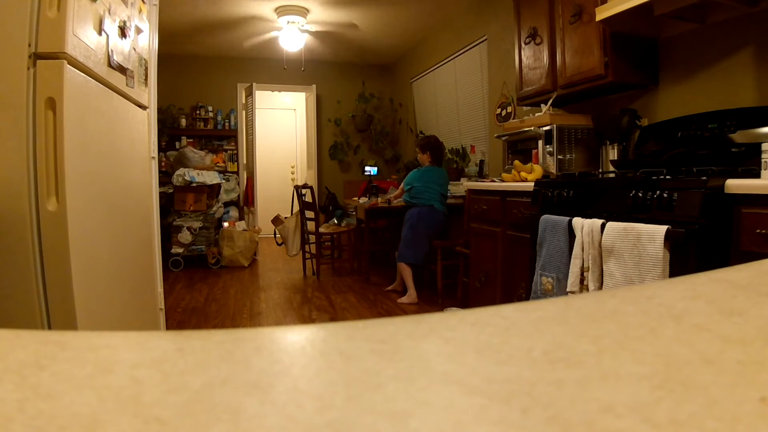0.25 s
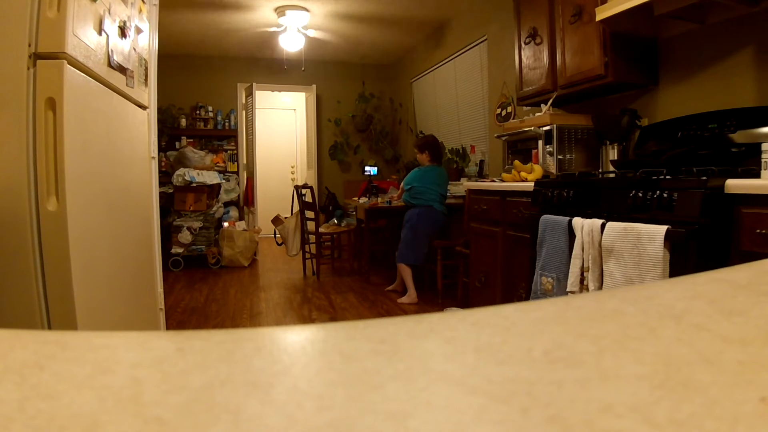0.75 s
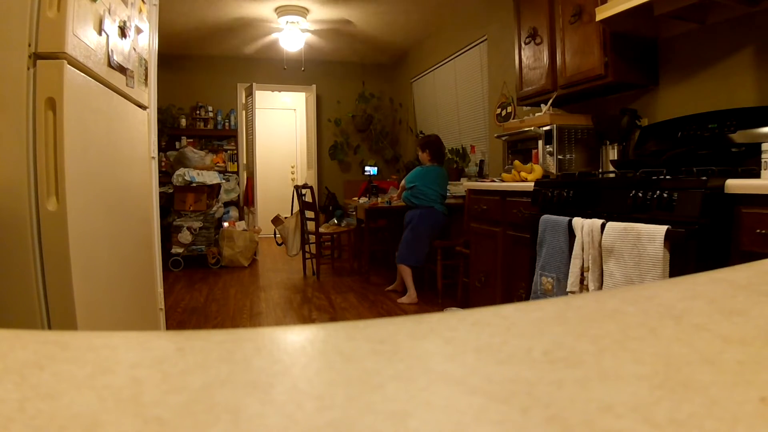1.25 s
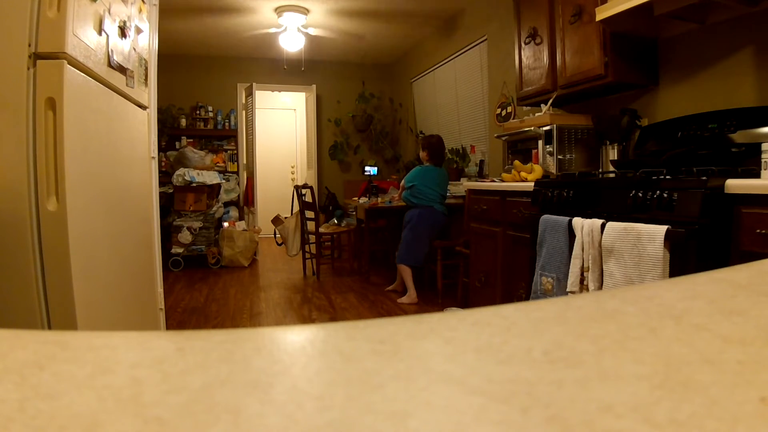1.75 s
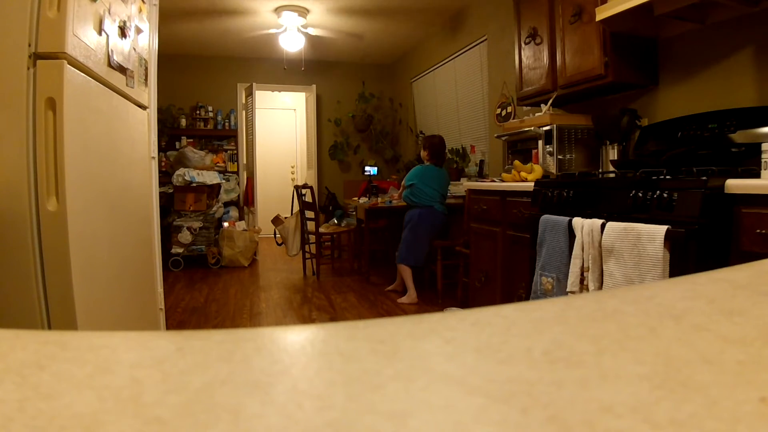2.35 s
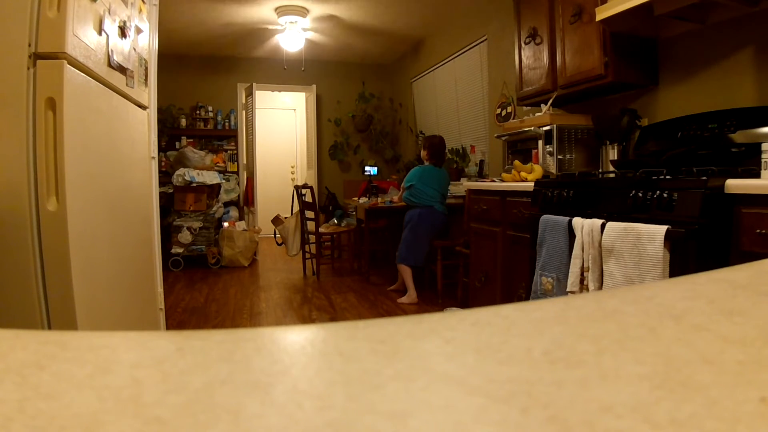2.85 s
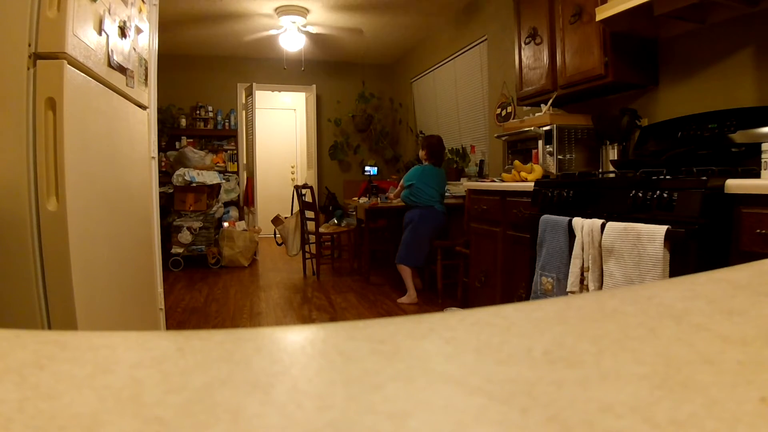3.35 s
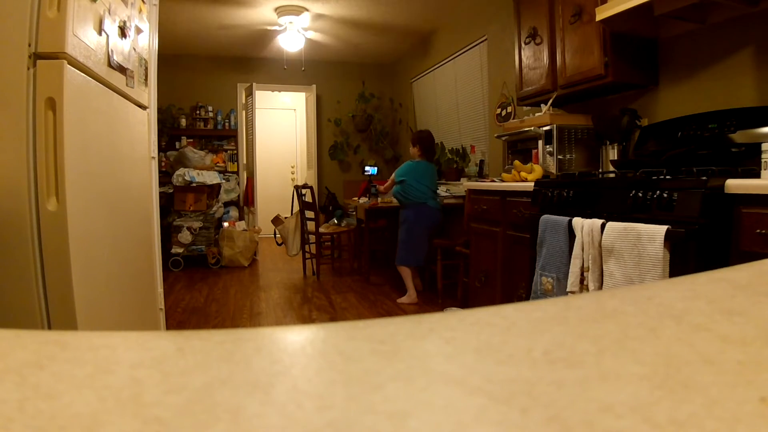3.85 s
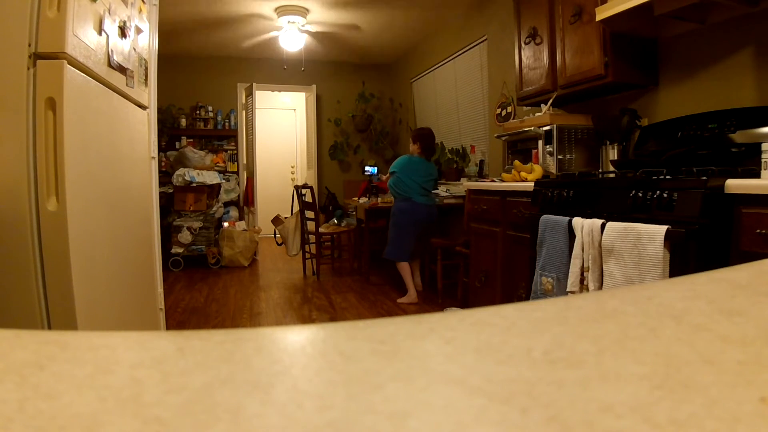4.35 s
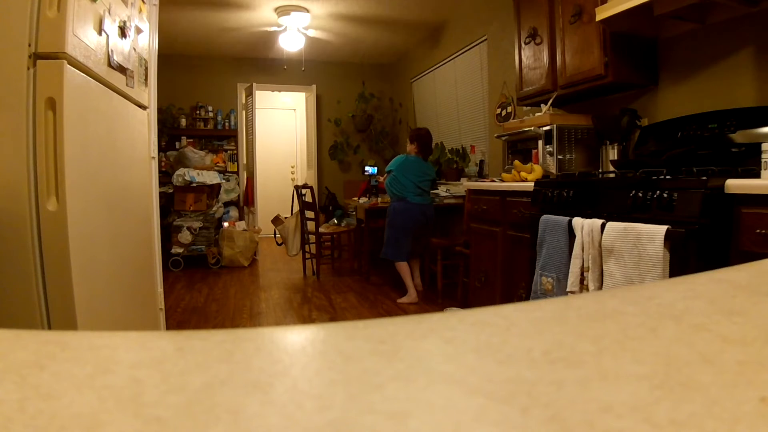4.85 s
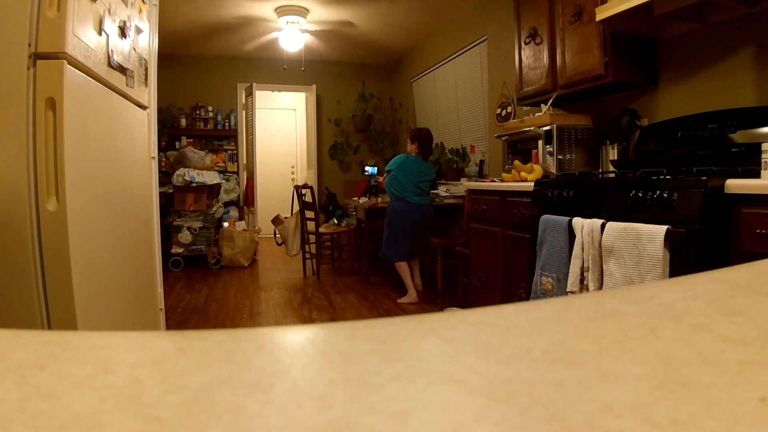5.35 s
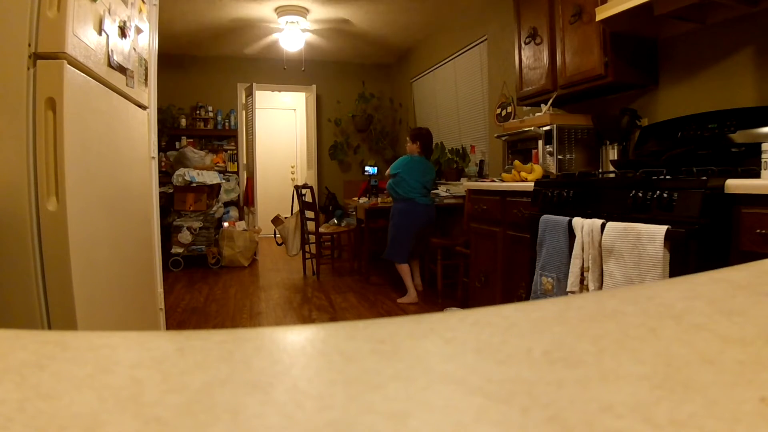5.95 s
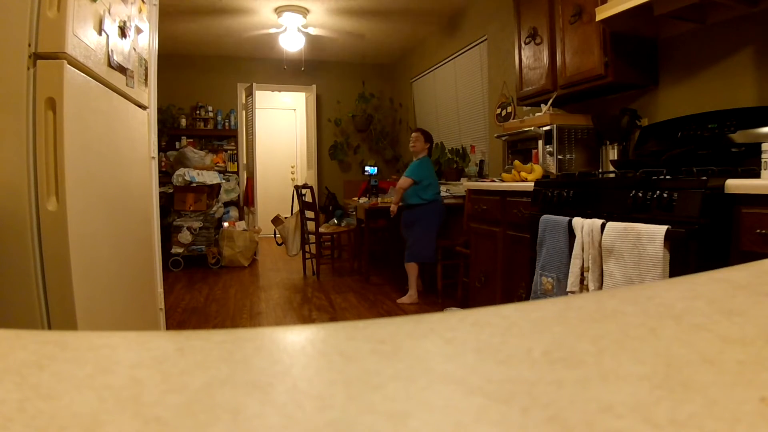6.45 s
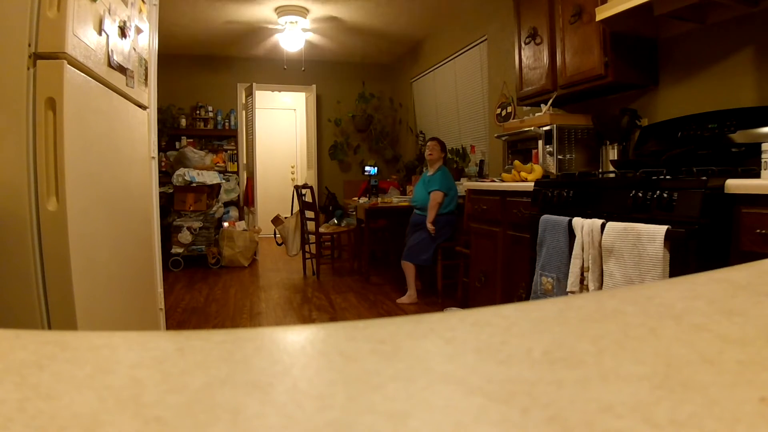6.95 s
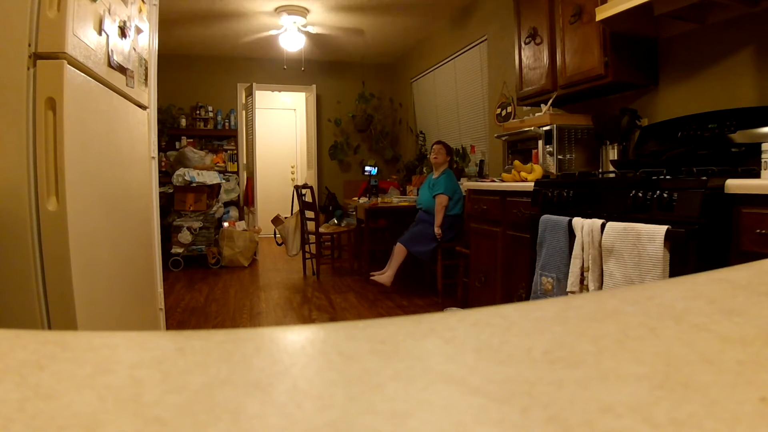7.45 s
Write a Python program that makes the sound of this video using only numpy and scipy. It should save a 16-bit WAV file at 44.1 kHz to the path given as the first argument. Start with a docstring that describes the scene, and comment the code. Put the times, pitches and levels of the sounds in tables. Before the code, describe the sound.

In a small kitchen a microwave oven runs throughout, a low mains hum with a gently throbbing fan and muffled rushing air. Over it come faint counter ticks, soft cloth brushes and a short foot scuff, then a dull floor thud and more light taps. Near the end a wooden chair knocks as someone sits. The microphone is stationary, with the person across the room and slight room echo.

```python
"""In a small kitchen a microwave oven runs: its transformer hums at harmonics of the mains.
Its cooling fan, turning just below mains speed, beats against the hum and blows noisy air through the vents.
Someone shifts about at the counter with faint taps, rustles and a scuff, then sits down on a wooden chair.
Periodic sources are sums of sines; air and contacts are shaped noise, with a short echo on the contacts."""
import sys
import numpy as np
from scipy import signal
from scipy.fft import rfft, irfft, next_fast_len
from scipy.io import wavfile
from scipy.ndimage import map_coordinates

SR = 44100
rng = np.random.default_rng(int(sys.argv[2]) if len(sys.argv) > 2 else 0)


def wav_out(sig):
    """Save sig, one row per channel (or a flat mono array), as 16-bit PCM at SR to the path in sys.argv[1]."""
    wavfile.write(sys.argv[1], SR, np.round(np.clip(np.atleast_2d(sig).T, -1, 1) * 32767).astype(np.int16))


N = 340452

MAINS_HZ, FAN_HZ, WHINE_HZ, DRONE_HZ = 59.975, 58.25, 100.8, 226.6
SWELL_PERIOD_S, SWELL_CREST_S = 5.3, 1.45  # slow cycle of the hum, and a time at its top
SQUEAK_HZ = 5300  # mean pitch
TOP_HZ = 15720  # band limit of the microphone

# In every colour table density_db is relative, in dB per Hz: the noise is then scaled to rms 1.
# Transformer harmonics: order (multiple of the mains), mean_rms_db
HUM_HARMONICS = [(1, -42.5), (2, -34), (3, -68), (4, -47), (5, -67.5), (7, -65.5), (9, -63), (12, -69),
                 (13, -70), (14, -66), (15, -65), (16, -76), (17, -66), (18, -65.5), (19, -78), (20, -76.5),
                 (21, -71.5), (22, -66), (24, -77), (25, -76), (26, -76.5), (27, -82), (28, -81), (30, -83)]
# Harmonics on the slow cycle: order, mean_rms_db, swing_db (negative sinks as the others rise)
SWELLING_HARMONICS = [(6, -45, 1.26), (8, -52, -.5), (10, -59, -2)]
# Fan tones, blade rate on top: order (multiple of the shaft rate), mean_rms_db
FAN_HARMONICS = [(1, -61.5), (2, -67), (7, -67), (8, -47.5)]
# A second, fainter motor: order (multiple of its speed), mean_rms_db
WHINE_HARMONICS = [(1, -64), (2, -59), (6, -69)]
# An unsteady drone: order, mean_rms_db
DRONE_HARMONICS = [(1, -58), (2, -67.5)]
# Spectrum of rushing air: frequency_hz, density_db
AIR_COLOUR = [(10, -11), (22, 1), (130, -1.5), (250, 4), (500, -2.5), (750, -3), (1080, -5), (1200, -12.5),
              (1700, -14.5), (1920, -22.5), (2600, -26.5), (3100, -40), (4300, -44.5), (6500, -59)]
# Resonances of the case and vents: centre_hz, width_hz, lift_db
VENT_RESONANCES = [(176, 21, 7.5), (199.3, 28, 10), (299, 26, 6.5), (356, 50, 8), (456, 33, 10.5),
                   (597, 69, 8), (910, 83, 1.5), (1366, 240, 3.5), (2095, 60, 3.5), (2630, 30, 5),
                   (2790, 62, 6.5), (2935, 45, 2.5), (3080, 70, 5), (3540, 140, 2), (4020, 350, 3)]
# Light taps and ticks at the counter: start_s, level_db, ring_db, ring_hz, t60_s, rise_s
COUNTER_TAPS = [(.247, -67, -75, 3250, .17, .005), (.664, -74, -76, 3150, .24, .01),
                (.666, -76, -82, 5500, .14, .005), (4.735, -66, -69, 3100, .18, .008),
                (4.803, -65, -73, 3300, .22, .006)]
# Spectrum of a tap: frequency_hz, density_db
TAP_SPECTRUM = [(150, -18), (700, -5), (1500, 2), (2200, -1.5), (3300, -8), (3900, -6.5), (4500, -17),
                (5500, -15.5), (6200, -26.5), (15000, -38.5)]
# A foot scuffs the floor, a push and a short slide: middle_s, length_s, level_db
FOOT_SCUFF = [(3.221, .027, -55), (3.254, .03, -61)]
# Spectrum of the scuff: frequency_hz, density_db
SCUFF_SPECTRUM = [(200, -8.5), (600, 4.5), (900, 4), (1400, 3.5), (1900, 2.5), (2200, 3), (2400, -5),
                  (2800, -1), (3200, -15.5), (3600, -10), (3900, -7.5), (4700, -13), (5100, -20),
                  (5600, -17.5), (6200, -34.5), (15000, -30.5)]
# Brushes of cloth and bare feet: middle_s, length_s, level_db
BRUSHES = [(1.455, .11, -64.5), (1.585, .15, -61), (3.14, .11, -69), (3.37, .16, -76), (6.19, .1, -74.5),
           (7.221, .12, -70), (7.45, .19, -67)]
# Spectrum of a brush: frequency_hz, density_db
BRUSH_SPECTRUM = [(200, -12), (800, 5), (1700, 2), (2200, -4), (3000, -9), (3600, -16.5), (4200, -18.5),
                  (4700, -26), (5600, -21.5), (7000, -33), (15000, -44)]
# Resonances of the rubbed surface: centre_hz, width_hz, lift_db
RUBBED_RESONANCES = [(1756, 91, 10), (2660, 130, 6.5), (3130, 110, 5.5), (3920, 90, 5), (4200, 130, 6)]
# Thin squeaks of that surface: middle_s, length_s, level_db
SURFACE_SQUEAKS = [(1.46, .07, -90.5), (1.535, .06, -86.5), (1.625, .07, -87), (3.135, 0.05, -87.5)]
# Soft thuds through the wooden floor: start_s, level_db (before the low-pass), centre_hz, width_hz, t60_s
FLOOR_THUDS = [(4.24, -33, 355, 45, .32), (4.245, -54, 1650, 450, .22), (4.245, -63, 2450, 300, .25),
               (4.29, -47, 520, 400, .7), (4.345, -57, 1500, 600, .25), (7.555, -46, 345, 50, .25)]
# The chair takes the weight: start_s, level_db, crack_db, t60_s, rise_s
CHAIR_KNOCKS = [(7.305, -43, -62.5, .16, .003), (7.319, -47, -70, .17, .003), (7.41, -52, -83, .2, .008),
                (7.553, -47, -77, .22, .007), (7.569, -49, -84, .14, .004)]
# Modes of the chair frame: centre_hz, width_hz, relative_db
CHAIR_MODES = [(740, 150, 0), (976, 200, -0.5), (1490, 340, -7.5), (1760, 170, -10), (2130, 200, -19),
               (2540, 290, -22)]
# Spectrum of the cracking joints: frequency_hz, density_db
CRACK_SPECTRUM = [(500, -10), (2800, -1), (3300, -3), (3900, 3), (4600, -2), (5400, -4.5), (5900, -15),
                  (7000, -23), (15000, -35.5)]
# Decay of the room: frequency_hz, t60_s
ROOM_DECAY = [(200, 0.45), (2000, 0.26), (10000, 0.2)]
# Spectrum of microphone hiss: frequency_hz, density_db
HISS_COLOUR = [(5000, -2), (7200, -4.5), (8200, -1), (15000, -2)]


def amp(db):
    """Level law: decibels to amplitude gain."""
    return 10 ** (np.asarray(db) / 20)


def unit(x):
    """Normalisation to rms 1."""
    return x / np.sqrt(np.mean(x ** 2) + 1e-20)


def clock():
    """Sampling: the time of every sample in seconds."""
    return np.arange(N) / SR


def along(points, hz):
    """Interpolation of (frequency, value) points on a logarithmic frequency axis."""
    f, v = np.transpose(points)
    return np.interp(np.log(hz + 1), np.log(f + 1), v)


def wobble(rate):
    """Slow random modulation: a smooth curve through random knots, rate knots a second."""
    knots = rng.standard_normal(int(N * rate / SR) + 4)
    coarse = clock()[::100]
    curve = map_coordinates(knots, [coarse * rate])
    return np.interp(clock(), coarse, curve)


def filtered(x, response):
    """Linear filtering: the spectrum of x times a response of frequency."""
    size = next_fast_len(N + SR // 2)
    gain = response(np.fft.rfftfreq(size, 1 / SR))
    return irfft(rfft(x, size) * gain, size)[:N]


def noise(colour):
    """Coloured noise of rms 1: white noise weighted by a dB function of frequency."""
    return unit(filtered(rng.standard_normal(N), lambda hz: amp(colour(hz))))


def bell(x, centre, width):
    """Gaussian hump of height 1, width taken at half height."""
    return 2 ** -((2 * (x - centre) / width) ** 2)


def resonances(hz, rows):
    """Resonance: smooth lifts in dB around each centre frequency."""
    return sum(lift_db * bell(hz, centre, width) for centre, width, lift_db in rows)


def blow(start, t60, attack):
    """Impulsive excitation: a quick rise with exponential decay."""
    t = np.maximum(clock() - start, 0)
    return (1 - np.exp(-t / attack)) * np.exp(-np.log(1000) * t / t60)


def strokes(rows):
    """Sliding excitation: rubbing strokes that each swell and fade smoothly."""
    return sum(amp(db) * bell(clock(), middle, length) for middle, length, db in rows)


def tones(hz, orders, slip, waver_db):
    """Fourier series of one cycle whose phase slips by a fraction of a turn; each harmonic wavers in level."""
    turns = hz * clock() + slip * wobble(1.5)
    total = 0
    for order, db in orders:
        level = amp(db + waver_db * wobble(3))
        phase = 2 * np.pi * (order * turns + rng.random())
        total = total + level * np.sqrt(2) * np.sin(phase)
    return total


def ripple(hz, spacing_hz, depth_db):
    """Standing waves of the room: fixed random peaks and dips along frequency, in dB."""
    grid = np.arange(0, SR / 2, spacing_hz)
    return depth_db * np.interp(hz, grid, rng.standard_normal(len(grid)))


def kitchen(x):
    """Reverberation: convolution with a short decaying noise tail in which the treble dies first."""
    hz, t, z = signal.stft(rng.standard_normal(SR // 2), SR, nperseg=256)
    decay = np.exp(-np.log(1000) * t / along(ROOM_DECAY, hz)[:, None])
    tail = signal.istft(z * decay, SR, nperseg=256)[1]
    return signal.fftconvolve(x, tail / np.linalg.norm(tail))[:N]


def handling():
    """Contact and friction: dry ticks, a two-burst scuff, and grainy brushes that ring and squeak."""
    def coloured(points):
        return noise(lambda hz: along(points, hz) + ripple(hz, spacing_hz=50, depth_db=2))

    clatter, sole = coloured(TAP_SPECTRUM), coloured(SCUFF_SPECTRUM)
    cloth = noise(lambda hz: along(BRUSH_SPECTRUM, hz) + resonances(hz, RUBBED_RESONANCES))
    squeak_turns = SQUEAK_HZ * clock() + 0.12 * wobble(110)
    squeak = np.sqrt(2) * np.sin(2 * np.pi * squeak_turns)

    taps = 0
    for start, db, ring_db, ring_hz, t60, rise in COUNTER_TAPS:
        ring = noise(lambda hz: 50 * bell(hz, ring_hz, 500))
        taps = taps + blow(start, t60, attack=rise) * (amp(db) * clatter + amp(ring_db) * ring)
    scuff = strokes(FOOT_SCUFF) * sole
    rubbing = strokes(BRUSHES) * cloth + strokes(SURFACE_SQUEAKS) * squeak
    # rapid random level changes give the grain
    return (taps + scuff) * amp(1.2 * wobble(250)) + rubbing * amp(1.3 * wobble(70))


def thuds():
    """Forced vibration of wood: knocks excite narrow bands for a boom, broad ones for a dull bump."""
    def wood(centre, width):
        return noise(lambda hz: -20 * np.log10(1 + (np.sqrt(2) * (hz - centre) / width) ** 2))

    knocks = sum(amp(db) * blow(start, t60, attack=0.0082) * wood(centre, width)
                 for start, db, centre, width, t60 in FLOOR_THUDS)
    return filtered(knocks, lambda hz: 1 / (1 + (hz / 3200) ** 4))  # soft contact leaves little treble


def chair():
    """Modal resonance: the wooden frame rings at each knock, and its joints add a short, bright crack."""
    def frame(hz):
        power = sum(amp(db) ** 2 / (1 + (2 * (hz - centre) / width) ** 2) ** 2
                    for centre, width, db in CHAIR_MODES)
        return 10 * np.log10(power)

    body = noise(frame)
    joints = noise(lambda hz: along(CRACK_SPECTRUM, hz))
    return sum(blow(start, t60, attack=rise) * (amp(db) * body + amp(crack_db) * joints)
               for start, db, crack_db, t60, rise in CHAIR_KNOCKS)


def air():
    """Flow noise: fan air excites the resonant case, modulated slightly by the buzz at twice the mains."""
    def colour(hz):
        case = along(AIR_COLOUR, hz) + resonances(hz, VENT_RESONANCES)
        walls = ripple(hz, spacing_hz=25, depth_db=2) * np.clip(hz / 2500, 0, 1)
        return case + walls

    rush = noise(colour)
    buzz = 1 + 0.18 * np.sin(2 * np.pi * 2 * MAINS_HZ * clock())
    return amp(-46.0 + 0.6 * wobble(4.3)) * rush * buzz


def motors():
    """Beating: the lagging fan shaft throbs against the hum, its blades against the 8th harmonic."""
    fan = tones(FAN_HZ, FAN_HARMONICS, slip=0.0021, waver_db=2.0)
    whine = tones(WHINE_HZ, WHINE_HARMONICS, slip=0.019, waver_db=0.5)
    drone = tones(DRONE_HZ, DRONE_HARMONICS, slip=0.3, waver_db=3)
    return fan + whine + drone


def transformer():
    """Forced vibration of the core at mains harmonics: low ones firm, some see-sawing, high ones wavering."""
    # probably the turntable carrying the load round
    cycle = np.cos(2 * np.pi * (clock() - SWELL_CREST_S) / SWELL_PERIOD_S)
    swelling = [(order, db + swing_db * cycle) for order, db, swing_db in SWELLING_HARMONICS]
    low, high = HUM_HARMONICS[:4], HUM_HARMONICS[4:]
    return (tones(MAINS_HZ, low, slip=0.0014, waver_db=0.3)
            + tones(MAINS_HZ, swelling, slip=0.004, waver_db=0.3)
            + tones(MAINS_HZ, high, slip=0.003, waver_db=0.8))


def scene():
    """Superposition of the oven and the small movements with their echo."""
    moves = handling() + thuds() + chair()
    echo = amp(-5.5) * kitchen(moves)
    oven = air() + motors() + transformer()
    return (moves + echo + oven)[None]


def record(dry):
    """Transduction: the microphone adds a faint hiss and keeps nothing above its band limit."""
    hiss = amp(-82.5) * noise(lambda hz: along(HISS_COLOUR, hz))
    return filtered(dry[0] + hiss, lambda hz: hz < TOP_HZ)[None]


dry = scene()
out = record(dry)
wav_out(out)
```